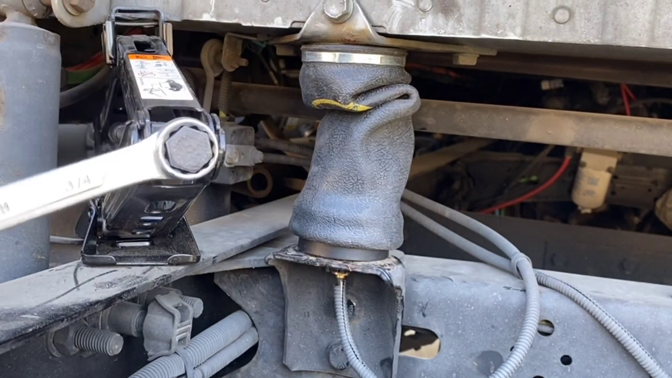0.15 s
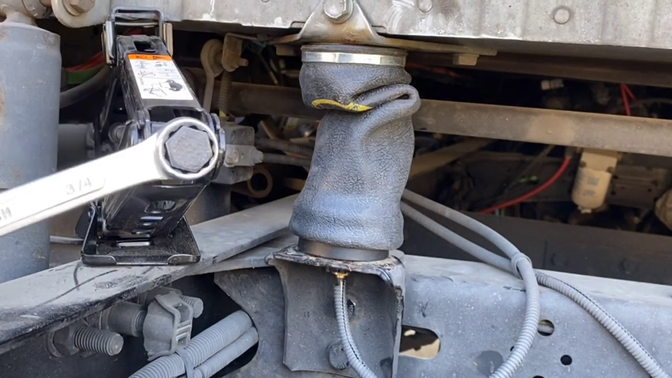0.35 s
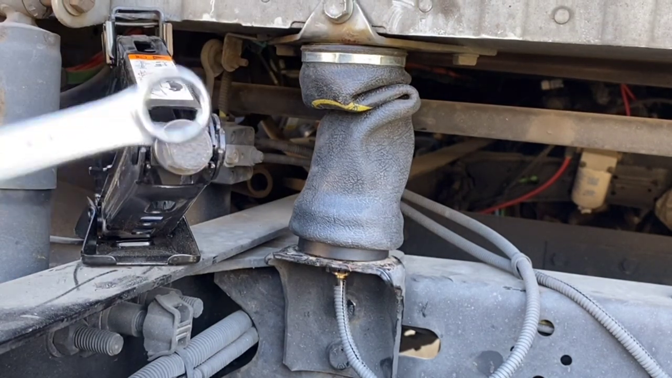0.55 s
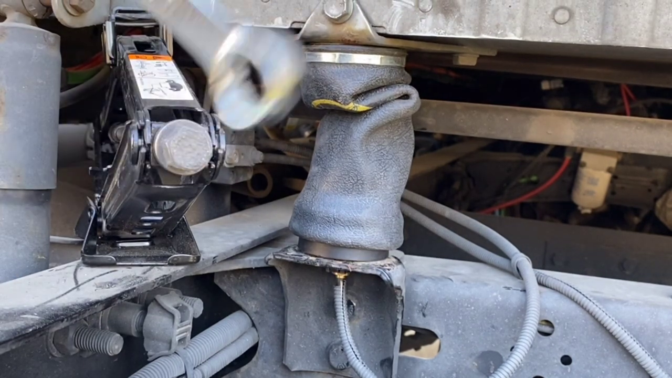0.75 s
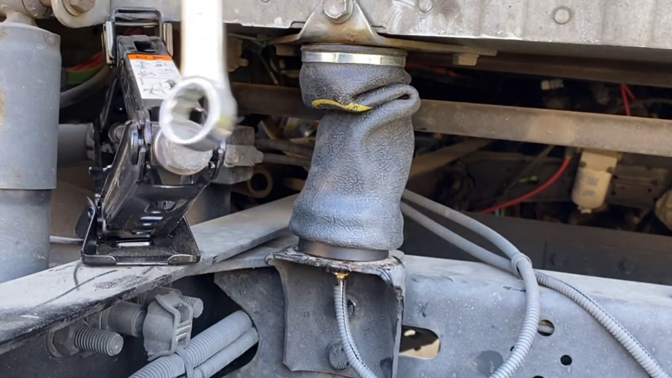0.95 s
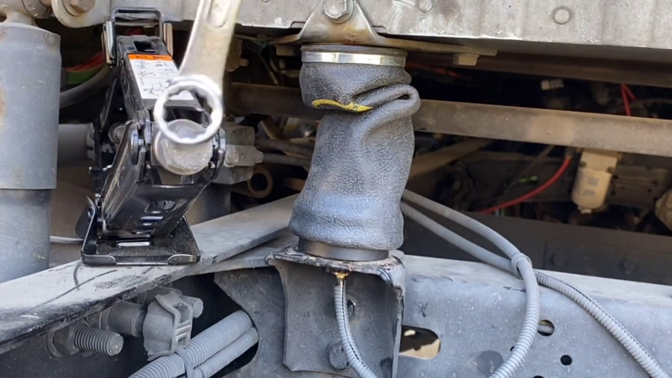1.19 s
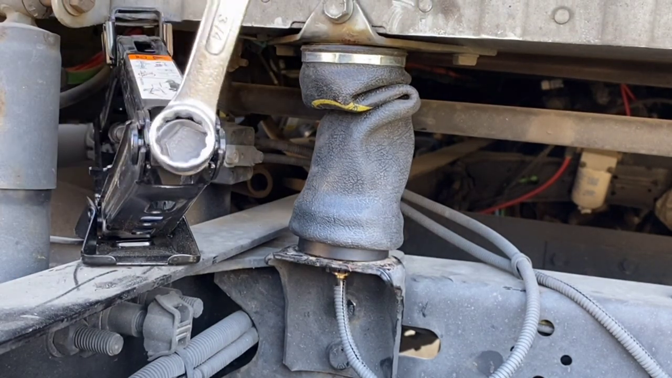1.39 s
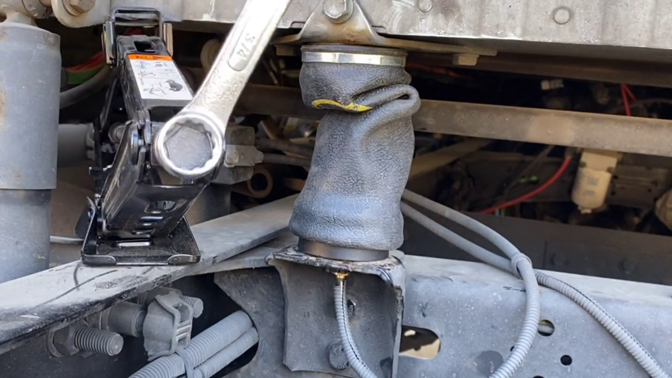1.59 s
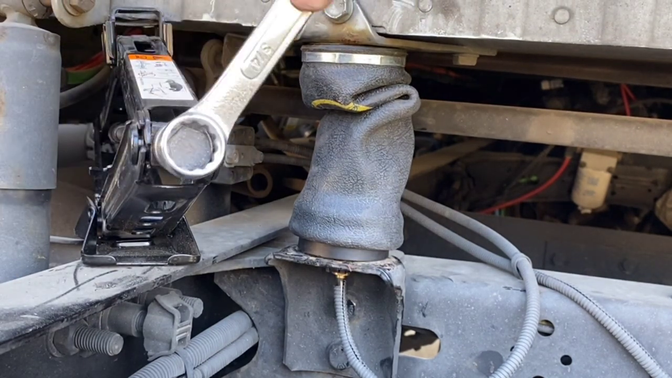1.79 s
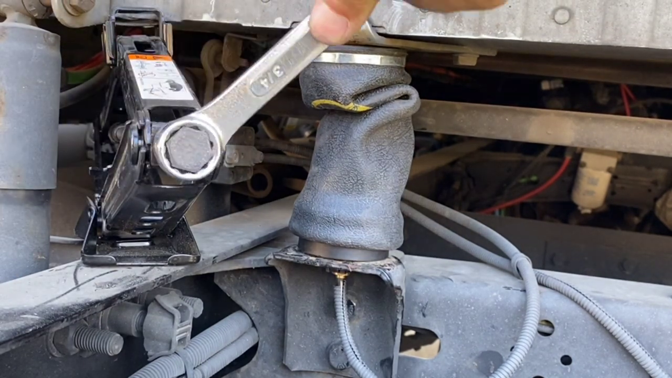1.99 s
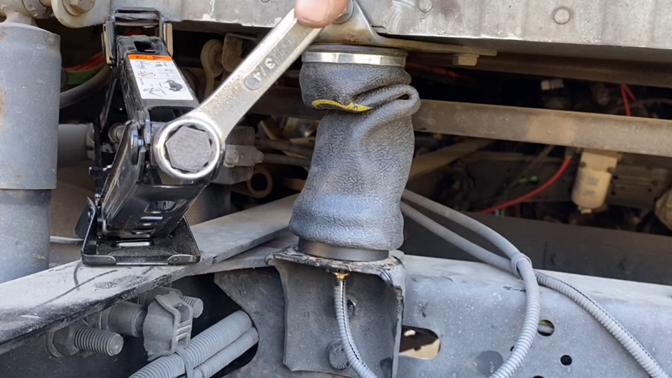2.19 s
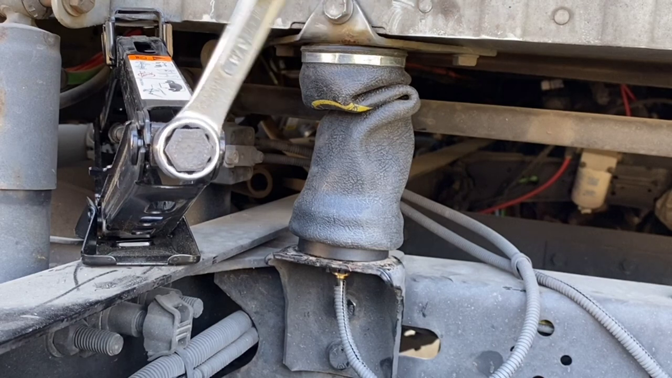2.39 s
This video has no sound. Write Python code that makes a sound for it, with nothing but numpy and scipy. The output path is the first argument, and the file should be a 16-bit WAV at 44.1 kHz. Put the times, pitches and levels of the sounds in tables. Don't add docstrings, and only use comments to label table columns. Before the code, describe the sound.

Ring wrench knocking and scraping a jack's screw head, bright metallic clinks, distant engine rumbling softly

```python
import sys
import numpy as np
from scipy import signal
from scipy.fft import rfft, irfft, next_fast_len
from scipy.io import wavfile
from scipy.ndimage import uniform_filter1d

SR = 44100
rng = np.random.default_rng(int(sys.argv[2]) if len(sys.argv) > 2 else 0)


def wav_record(signal):
    frames = np.transpose(np.atleast_2d(signal))
    bounded = np.clip(frames, -1, 1)
    quanta = np.round(bounded * 32767).astype(np.int16)
    wavfile.write(sys.argv[1], SR, quanta)


def boost_factor(decibels):
    exponent = np.asarray(decibels, float) / 20
    return 10 ** exponent


N = 108045

# [s, dB, dB, dB, s]
KNOCKS = [(0.0881, -72, -50.5, -42, 0.00017), (0.2217, -37, -19, -20, 0.002),
          (0.2254, -24, -15.5, -15, 0.002), (0.409, -35, -41, -47.5, 0.03), (0.707, -60.5, -51, -58, 0.037),
          (1.2288, -53, -33.5, -22, 0.0083), (1.253, -47, -36.5, -36, 0.0081),
          (1.288, -44.5, -32.5, -26, 0.0087), (1.468, -33, -43.5, -53, .01),
          (1.523, -33.5, -35.5, -42, 0.023), (1.565, -23.5, -26, -32, 0.004),
          (1.85, -50.5, -64, -70, 0.0023), (1.885, -37, -45, -52, .005), (1.942, -19, -29, -31, 0.0065),
          (2.082, -33.5, -64, -44, 0.00643), (2.112, -27, -25, -12.5, 0.0039),
          (2.117, -22.5, -21, -11, 0.011)]
# [s, dB, dB, dB, s]
GRINDS = [(0.044, -65, -52.5, -58.5, 0.03), (0.21, -53, -38, -58, 0.0074),
          (0.433, -18.5, -13, -25.5, 0.049), (0.567, -41, -46, -54, 0.088), (0.808, -68, -65, -54.5, 0.038),
          (0.88, -75, -50.5, -61, 0.59), (1.33, -51.5, -44.5, -64, 0.034), (1.536, -31, -50, -47, 0.014),
          (1.572, -31.5, -43.5, -57, .02), (1.87, -27.5, -27, -41, 0.019),
          (1.933, -21.5, -21.5, -28, 0.019), (1.972, -28, -32, -66, 0.029)]


def chatter():
    clicks_per_s, click_spread_db = 4000, 4
    first_blow = 2.16
    t = np.arange(N) / SR
    clicks = (rng.random(N) < clicks_per_s / SR) * rng.choice([-1, 1], N)
    clicks = clicks * boost_factor(click_spread_db * rng.standard_normal(N))
    shapes = [(start, .0006, length, .8) for start, *_, length in KNOCKS]
    shapes += [(start, .45 * length, length, 0) for start, *_, length in GRINDS]
    rows = []
    for start, rise, length, sag in shapes:
        release = .002 + min(.33 * length, .07)
        press = np.clip((t - start) / rise, 0, 1) ** 1.3
        let_go = np.exp(-np.clip((t - start - length) / release, 0, 40))
        weaken = np.exp(-sag * np.clip((t - start) / length, 0, 1))
        blow = first_blow * (np.arange(N) == int((start + rise) * SR))
        rows.append(clicks * press * let_go * weaken + blow)
    rows = np.array(rows)
    return rows / np.sqrt(np.sum(rows ** 2, axis=1, keepdims=True))


def ring(force, hz, t60):
    r, w = boost_factor(-60 / (max(t60, .005) * SR)), 2 * np.pi * hz / SR
    return signal.lfilter([0, np.sin(w)], [1, -2 * r * np.cos(w), r * r], force + 1e-18)


def body(forces, strength_db, modes):
    spread_db = 1.5 * rng.standard_normal((len(forces), len(modes)))
    size = next_fast_len(N)
    power = np.abs(rfft(forces, size)) ** 2
    power = uniform_filter1d(power, size=int(15 * N / SR) + 1, axis=1)
    out = 0
    for k, (hz, db, t60) in enumerate(modes):
        share = np.sqrt(power[:, int(hz * size / SR)] + .03)
        gains = boost_factor(strength_db + db + spread_db[:, k]) / share
        out = out + ring(gains @ forces, hz, t60)
    return out


def as_modes(peaks):
    modes = []
    for hz, width, db in peaks:
        t60 = min(2.21 * np.log(1000) / (np.pi * width), 480 / hz)
        modes.append((hz, db + 20 * np.log10(width / 40), t60))
    return modes


# [Hz, Hz, dB]
PULLED = [(595, 70, -8.5), (1080, 43, -5.5), (2293, 51, 1.5), (2761, 48, 1), (3450, 25, -17.5),
          (3730, 76, -2), (4505, 110, -12.5), (4650, 29, -14), (5930, 31, -19), (10000, 24, -27),
          (10740, 73, -37.5), (14600, 120, -48), (15500, 97, -43.5)]
LIFTED = [(841.6, 26, -2.5), (957, 49, 3), (1470, 59, -1.5), (1792, 96, -5.5), (2316, 21, -7),
          (2834, 63, -18.5), (3700, 40, -23), (4330, 72, -18.5), (4880, 28, -14.5), (6300, 66, -16.5),
          (7160, 75, -29), (10530, 78, -20), (11900, 28, -24), (14980, 130, -29)]
TAPPED = [(873, 109, -4), (2118, 170, -14.5), (3040, 73, -2), (3400, 28, -0.5), (3650, 33, -1),
          (4396, 50, -7), (5000, 78, -1), (5000, 66, -8), (7406, 39, -9), (7740, 94, -5), (7400, 29, -15),
          (10500, 56, -15), (11500, 49, -27), (14300, 50, -21)]
SEATED = [(829, 53, 4.5), (1530, 37, -10.5), (1777, 39, -6), (2444, 59, -12.5), (2690, 47, -12.5),
          (3170, 25, -22), (3460, 53, -14.5), (3670, 57, -15), (5120, 65, -26), (7050, 120, -33),
          (11200, 220, -33), (11300, 71, -29)]
LOADED = [(560, 26, -12), (737, 27, 7), (1003, 33, 3.5), (1480, 29, -12.5), (1787, 51, -1), (2160, 26, -20),
          (2520, 28, -12), (2920, 30, -13), (4280, 39, -9), (5050, 43, -10), (7250, 110, -38),
          (10330, 130, -29)]
SLIPPED = [(570, 44, 2.5), (850, 54, -2.5), (1237, 40, -12), (1644, 110, -4), (2253, 56, -9),
           (2830, 40, -20), (3180, 26, -26), (4370, 65, -14), (4880, 28, -28), (6140, 50, -37),
           (10800, 43, -37), (11200, 32, -16), (15100, 34, -39.5)]
CAUGHT = [(573, 29, -12.5), (2244, 32, -4.5), (3150, 41, -15), (3550, 32, -6.5), (4200, 33, -20.5),
          (4300, 46, -4.5), (4800, 26, -11), (6870, 28, -25), (7400, 44, -4.5), (8300, 49, -27),
          (9600, 46, -7), (12300, 32, -3), (14270, 79, -25), (15500, 46, -32)]
STAGE_ENDS_S = [
    .4,
    1.2,
    1.4,
    1.8,
    1.93,
    2.05,
]
STAGE_RING_DB = [-9.5, -7.5, -11, -7, -8.5, -4.5, -8.5]
STAGE_SLOW_DB = [-1.5, 7, 10, 0, -4, -3, -0.5]
# [Hz, dB, s]
SLOW_RINGS = [(408, -26, 1), (519, -26, .5), (976, -17, .25), (977, -13.5, 0.46), (1550, -30.5, .4),
              (3530, -38, 0.52), (6460, -42, 0.21)]


def clear_rings(forces, starts, lengths, strengths):
    whole_db = 10 * np.log10(sum(boost_factor(db) ** 2 for db in strengths))
    stage = np.where(lengths < .2, np.searchsorted(STAGE_ENDS_S, starts), -1)
    clear = 0
    for k, peaks in enumerate([PULLED, LIFTED, TAPPED, SEATED, LOADED, SLIPPED, CAUGHT]):
        now = stage == k
        clear = clear + body(forces[now], whole_db[now] + STAGE_RING_DB[k], as_modes(peaks))
    slow_db = strengths[0] + np.take(STAGE_SLOW_DB, stage)
    clear = clear + body(forces[stage >= 0], slow_db[stage >= 0], SLOW_RINGS)
    return high_pass(clear, 4, 226)


def high_pass(sound, order, hz):
    return signal.sosfilt(signal.butter(order, hz, "high", fs=SR, output="sos"), sound)


def dry_contact(forces, lengths, strengths):
    brief_db = 8.5 - 20 * np.log10(lengths / .0015)
    tick = high_pass(boost_factor(strengths[2] + brief_db) @ forces, 2, 1100)
    rasp = high_pass(boost_factor(strengths[1] - 17.5) @ forces, 4, 9500)
    return tick + rasp


# [Hz, dB, s]
CHASSIS = [
    (152.9, -1, 0.87),
    (151.6, -11, 0.44),
]


def chassis_beam(forces, strengths):
    return ring(body(forces, strengths[0] - 23.5, CHASSIS), 170.0, 0.29) * 0.0077


# [Hz, dB]
FRAME_CROWD = [(180, -21.5), (300, -8), (550, 5.5), (800, 4.5), (1100, 2), (1400, 5), (2200, -14)]
SCREW_CROWD = [(800, 3.5), (1400, 2), (2200, 4), (3000, 11), (4200, -4.5), (6000, -5.5)]
WRENCH_CROWD = [(2000, -3.5), (3200, 0.5), (4400, 10), (6300, -3), (7700, 5.5), (9500, 2), (12000, -27),
                (16000, 8)]
# [Hz, s]
CROWD_T60 = [(250, 0.38), (1000, 0.38), (3000, 0.14), (7000, 0.084), (16000, 0.021)]


def crowd(forces, strengths):
    colours = [FRAME_CROWD, SCREW_CROWD, WRENCH_CROWD]
    t, size, out = np.arange(SR) / SR, next_fast_len(N + SR), 0
    edges = 160 * 2 ** (np.arange(21) / 3)
    for low, high in zip(edges, edges[1:]):
        hz = np.sqrt(low * high)
        decay = boost_factor(-60 * t / at_hz(CROWD_T60, hz))
        decay += boost_factor(6 - 60 * t * hz / 61.2)
        decay += boost_factor(-21.5 - 7 * np.log2(hz / 1000) - 60 * t / .86)
        noise = stereo_band(rng.standard_normal((2, SR)), low, high)
        answer = decay * noise / np.sqrt(hz / 40)
        power = 0
        for db, colour in zip(strengths, colours):
            power = power + boost_factor(db + at_hz([(28, -96.5), *colour, (20000, -77)], hz)) ** 2
        gains = np.sqrt(power) * boost_factor(8 + 1.5 * rng.standard_normal(len(forces)))
        out = out + rfft(gains @ forces, size) * rfft(answer, size)
    return irfft(out, size)[:, :N]


def jack():
    forces = chatter()
    starts, *strengths, lengths = np.transpose([*KNOCKS, *GRINDS])
    clear = clear_rings(forces, starts, lengths, strengths)
    touch = dry_contact(forces, lengths, strengths)
    return clear + touch + chassis_beam(forces, strengths) + crowd(forces, strengths)


def at_hz(points, hz):
    return np.interp(np.log(hz), np.log(np.array(points)[:, 0]), np.array(points)[:, 1])


def rms_one(x):
    return x / np.sqrt(np.mean(x ** 2) + 1e-20)


def drift(rate):
    r = np.exp(-80 * np.pi * rate / SR)
    slow = signal.lfilter([1], [1, -2 * r, r * r], rng.standard_normal(N // 40 + 2002))
    slow = slow[2000:]
    return np.interp(np.arange(N) / 40, np.arange(len(slow)), rms_one(slow))


# [Hz, 0 to 1]
LIKENESS = [(30, .97), (100, .9), (300, .75), (1000, .45), (2500, .93), (5000, .97), (8000, .97)]


def stereo_band(white, low, high):
    band = signal.butter(2, [low, high], "band", fs=SR, output="sos")
    mid, side = signal.sosfilt(band, white)
    alike = np.clip(at_hz(LIKENESS, np.sqrt(low * high)), 0, 1)
    return np.sqrt(1 + alike) * mid + np.sqrt(1 - alike) * side * [[1], [-1]]


def banded_noise(spectrum, patchy_db):
    out, together, edges = 0, drift(3.0), 22 * 2 ** np.arange(0, 9.8, .5)
    white = rng.standard_normal((2, 2, N))
    for k, (low, high) in enumerate(zip(edges, edges[1:])):
        flicker_db = patchy_db * (0.7 * together + drift(16))
        gain = boost_factor(at_hz(spectrum, np.sqrt(low * high)) + flicker_db)
        out = out + gain * stereo_band(white[k % 2], low, high)
    return rms_one(out)


# [Hz, dB per Hz]
RUMBLE = [(15, -51), (25, -28), (52, -0.5), (141, -6.5), (168, -1.5), (227, -52), (251, -35.5), (325, -28),
          (400, -22.5), (520, -62), (880, -120)]
# [s, dB]
ENGINE_SWELL = [
    (0, -3.5),
    (.6, 4),
    (1.2, 0),
    (1.8, -0.5),
    (2.1, 4),
    (2.45, -0.5),
]


def engine():
    turn = 2 * np.pi * np.cumsum(62.5 * (1 + 0.056 * drift(5.0))) / SR
    swell = boost_factor(np.interp(np.arange(N) / SR, *np.transpose(ENGINE_SWELL)))
    rumble = boost_factor(-43.5) * banded_noise([*RUMBLE, (800, -57.5)], patchy_db=.8)
    firing = boost_factor(-47 + 2.5 * drift(4.5)) * np.sin(turn)
    return swell * (rumble + firing)


# [Hz, dB per Hz]
AIR = [(300, 3), (700, -2.5), (1500, -8), (3000, -27), (5000, -35), (8000, -35), (11000, -11.5),
       (16000, -25.5)]


def yard_air():
    return boost_factor(-57) * banded_noise(AIR, patchy_db=-1.0)


def scene():
    return jack() + engine() + yard_air()


def band_limit(x):
    return signal.sosfilt(signal.butter(12, 16390, fs=SR, output="sos"), x)


# [Hz, rad]
LEAD = [(250, 0), (780, 1.2), (1030, .8), (1400, 2.2), (1850, 0), (7500, -.3), (10900, -5.9),
        (15200, -12.6)]
# [Hz, dB]
LEAN = [(60, -3.2), (300, -3.2), (600, -.2), (1200, -.8), (3000, .4), (12000, -.1)]


def record(dry):
    size = next_fast_len(N + 2048)
    hz = np.arange(size // 2 + 1) * SR / size + 1e-3
    half = boost_factor(at_hz(LEAN, hz) / 2) * np.exp(.5j * np.interp(hz, *np.transpose(LEAD)))
    ports = irfft(rfft(dry, size) * [half, 1 / half], size)[:, :N]
    rounded = 1.887 * np.tanh(ports / 1.222)
    cut = signal.sosfilt(signal.cheby2(12, 60, 16200, fs=SR, output="sos"), rounded)
    return band_limit(cut)


dry = scene()
out = record(dry)
wav_record(out)
```